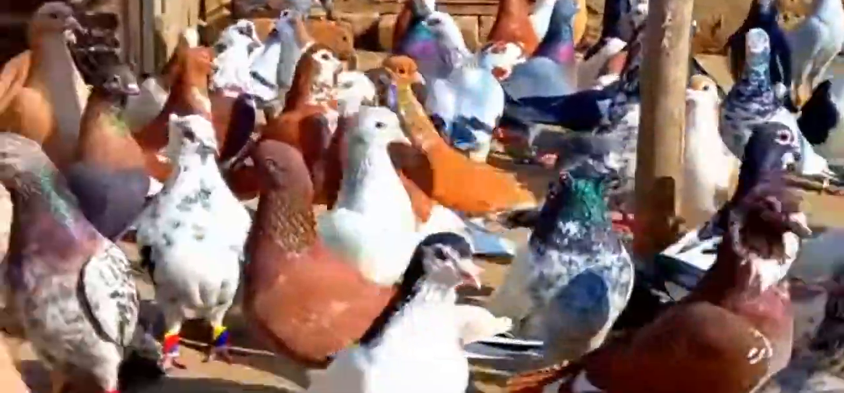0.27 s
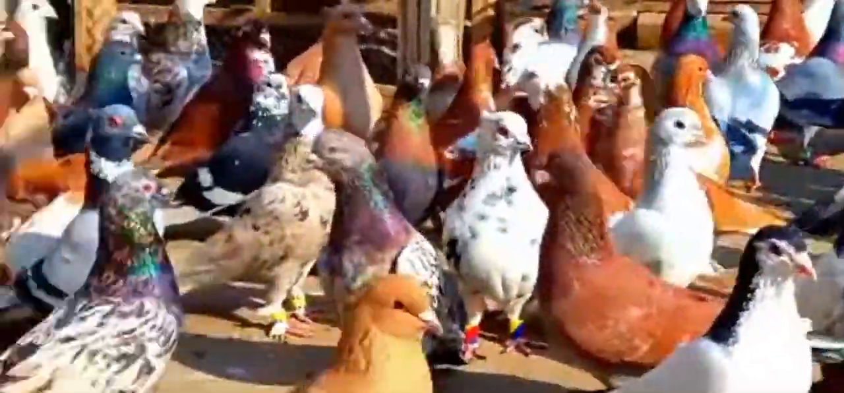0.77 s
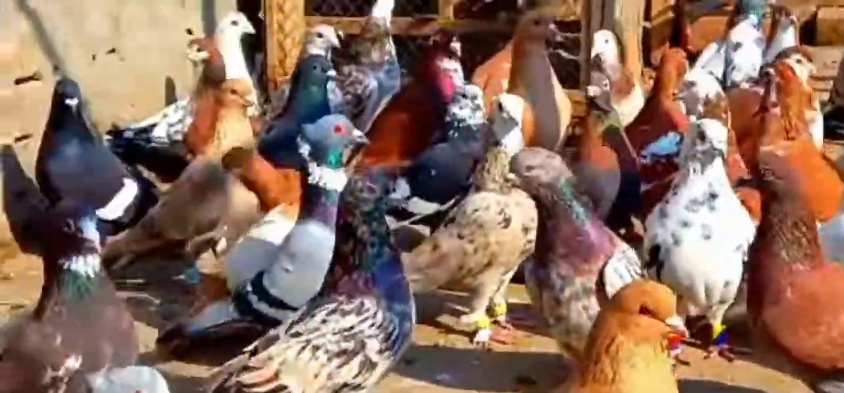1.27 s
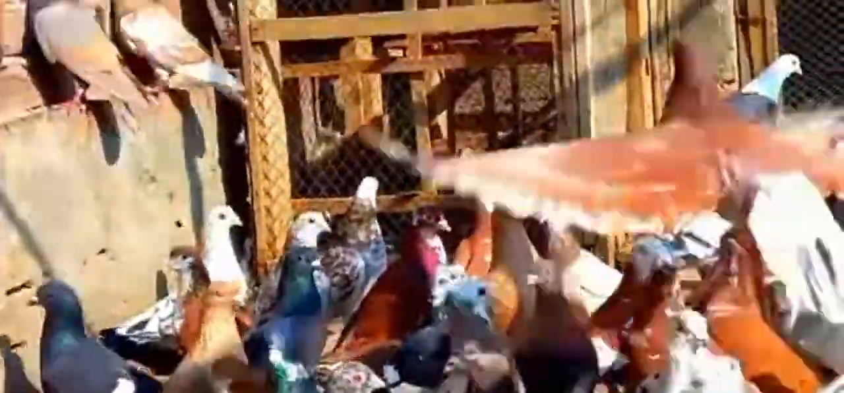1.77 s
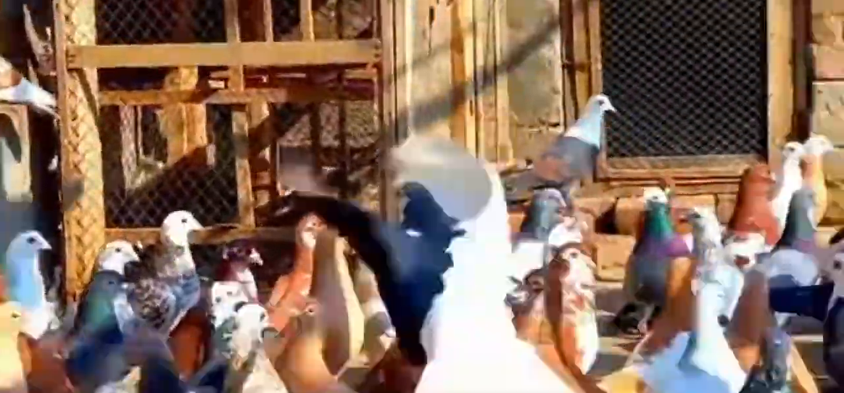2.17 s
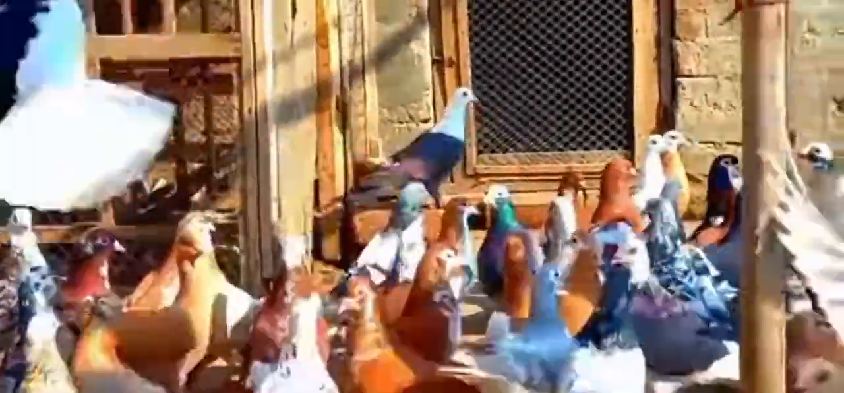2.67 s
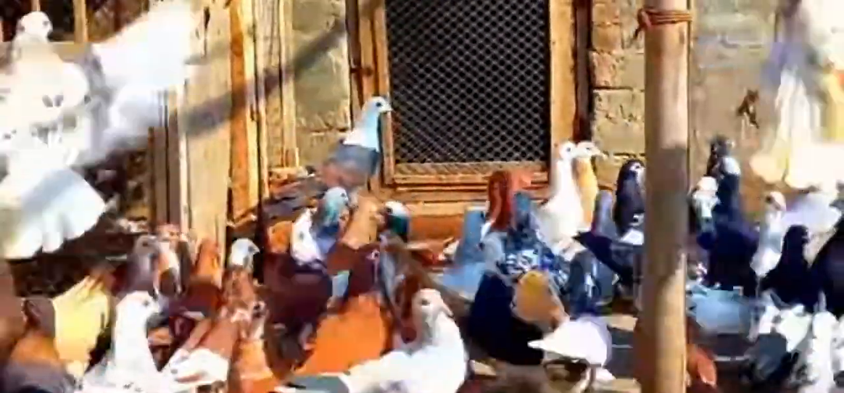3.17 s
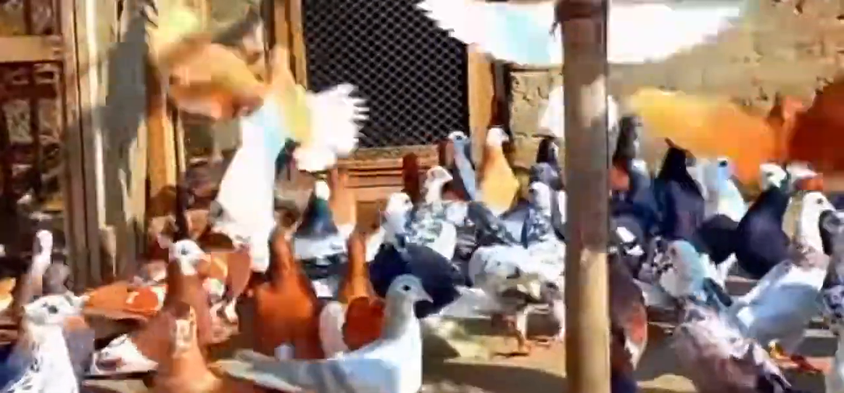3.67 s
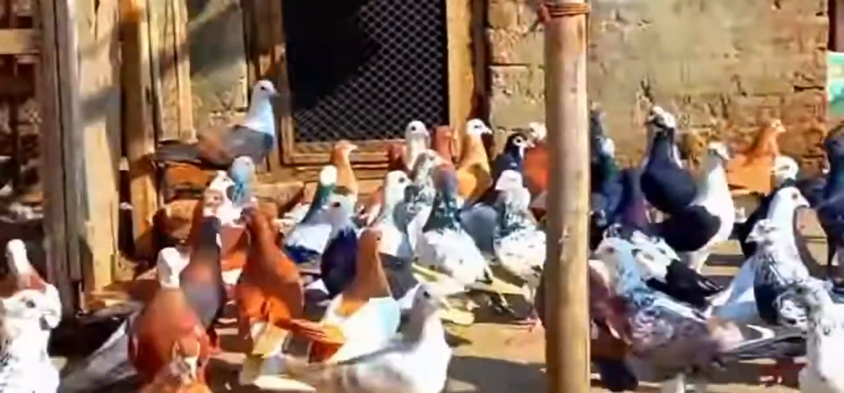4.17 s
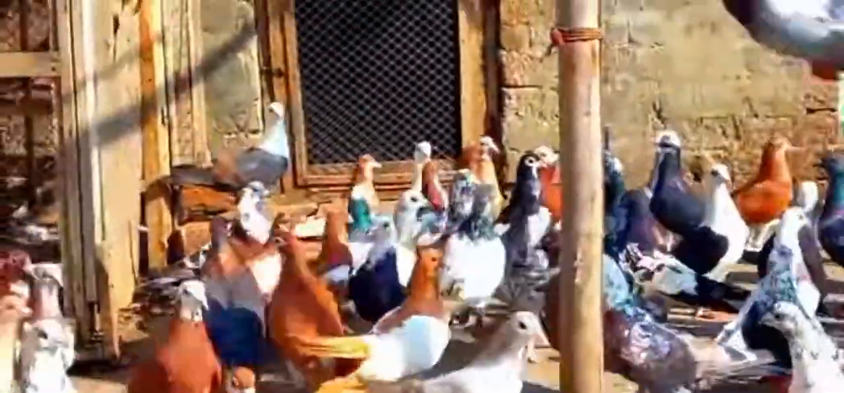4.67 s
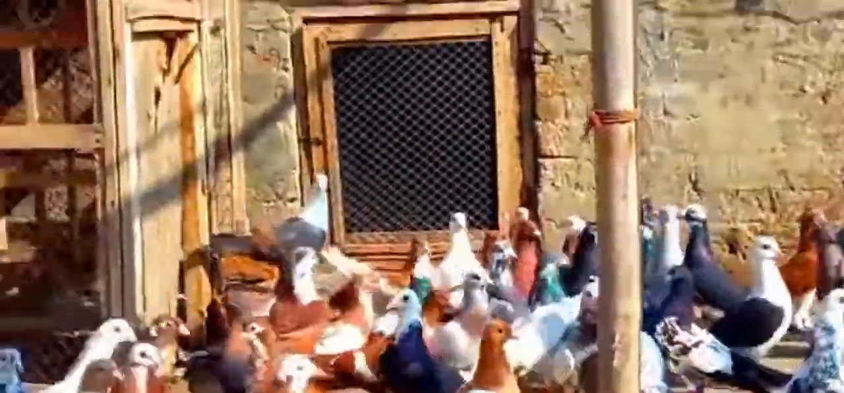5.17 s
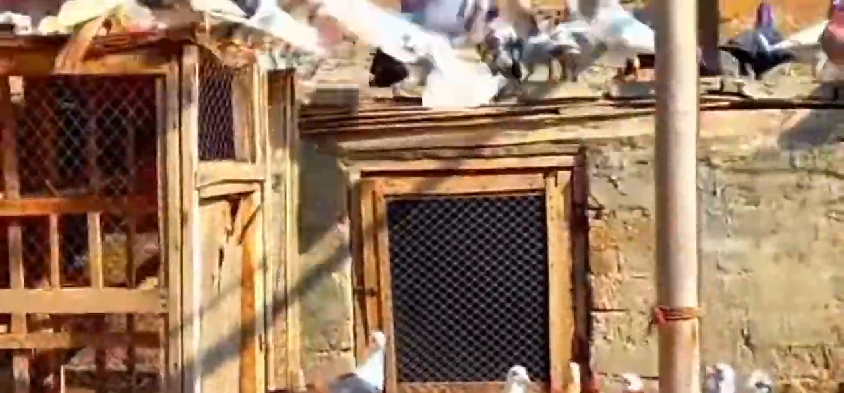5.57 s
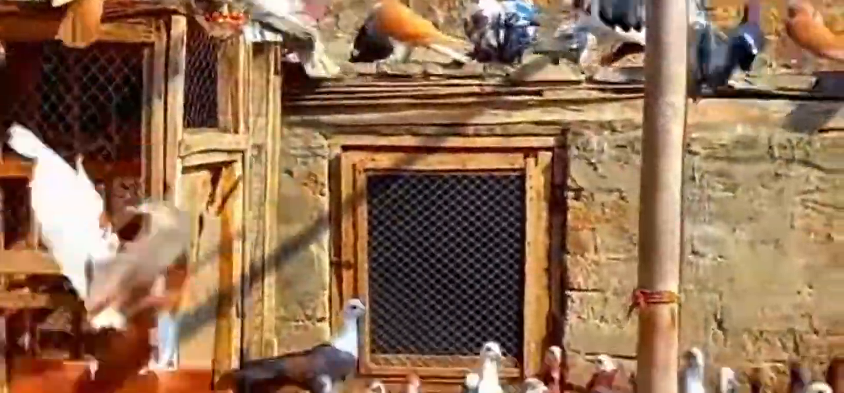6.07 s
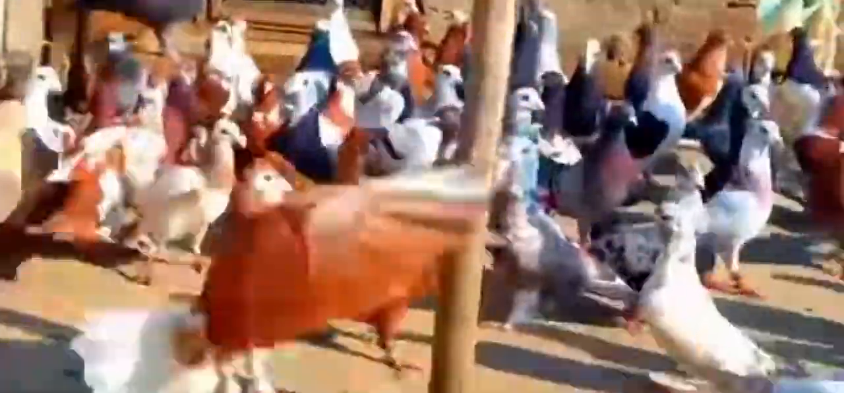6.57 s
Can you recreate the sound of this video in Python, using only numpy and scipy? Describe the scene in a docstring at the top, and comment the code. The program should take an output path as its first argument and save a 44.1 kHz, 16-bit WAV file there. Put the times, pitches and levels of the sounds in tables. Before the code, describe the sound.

Pigeons in a small walled yard: quiet at first, a soft coo and metal latch knocks, then wings flap and clap ever denser and closer.

```python
"""Pigeons in a walled yard

A flock of pigeons takes off and lands in a small walled yard, close to a hand-held phone.
Bands of noise swish, whistle and clap as wings over the blur of farther wings; decaying tones knock
a metal latch twice, with fainter touches after, and jingle leg rings. One bird coos on a throbbing note,
low pops and a gust of noise are downwash on the microphone, and sparse echoes are the brick walls."""
import sys
import numpy as np
from scipy import signal
from scipy.fft import rfft, irfft, next_fast_len
from scipy.io import wavfile
from scipy.ndimage import uniform_filter1d

SR = 44100
rng = np.random.default_rng(int(sys.argv[2]) if len(sys.argv) > 2 else 0)


def transcribe(u):
    """Save the signal u as a 16-bit wav file named by the first command-line argument.

    u: samples, shape (n,) or (channels, n), limited to [-1, 1]; the rate is SR.
    q: integer samples, one column per channel.
    """
    v = np.clip(np.atleast_2d(u).T, -1, 1)
    q = np.round(v * 32767).astype(np.int16)
    wavfile.write(sys.argv[1], SR, q)


N = 300762

# blur of many wings, before it throbs: (time [s], swish [dB], feather hiss [dB], low whoosh [dB], thin air [dB])
FLOCK = [(0.0, -58, -73, -60, -84), (0.49, -52, -61, -65, -84), (0.68, -43, -57, -49.5, -73),
         (0.82, -38, -45, -56, -74), (0.99, -40, -52, -51, -84), (1.25, -41, -65, -48, -81),
         (1.46, -43, -53.5, -54.5, -69), (1.82, -34.5, -46, -55, -58), (2.09, -31, -47, -40, -55),
         (2.49, -33.5, -49.5, -46.5, -71), (3.0, -35, -48.5, -47, -70), (3.25, -26, -39.5, -40, -52),
         (3.51, -27, -33, -38, -47), (3.74, -28.5, -39, -42.5, -39.5), (4.16, -32.5, -40, -52, -48),
         (4.5, -35.5, -46.5, -51.5, -52), (4.88, -32, -44.5, -51, -47.5), (5.05, -30, -41.5, -54, -40),
         (5.19, -31, -42.5, -49.5, -45), (5.45, -29, -40, -51, -48), (5.77, -37.5, -49.5, -47.5, -53.5),
         (6.04, -39, -44.5, -47, -51.5), (6.3, -27.5, -35, -38.5, -72), (6.82, -24, -27.5, -28.5, -60)]
# colour of wing noise at the phone: (frequency [Hz], density [dB per Hz])
WING = [(120, -45), (240, -14), (600, -6), (1120, -7), (1265, -1.5), (1480, -5), (2450, 0.5), (3200, -6),
        (4500, -18), (5600, -11), (6900, -14.5), (8800, -34.5), (10800, -48.5), (13200, -56), (15200, -50)]


def gain_of(db):
    """Decibels to gain."""
    return 10 ** (np.asarray(db) / 20)


def evened(x):
    """Scaled to rms 1."""
    return x / np.sqrt(np.mean(x ** 2) + 1e-20)


def add(mix, s, sound):
    """Lays a sound into the mix at time s, cut at the end."""
    part = mix[..., round(s * SR):][..., :sound.shape[-1]]
    part += sound[..., :part.shape[-1]]


def curve(rows):
    """Columns of a table joined by straight lines, one value a sample."""
    s, *columns = np.transpose(rows)
    return np.array([np.interp(np.arange(N) / SR, s, c) for c in columns])


def coloured(points, low_hz=0, high_hz=SR):
    """Noise of rms 1 with the given spectrum, between two soft edges."""
    size = next_fast_len(N)
    hz = np.fft.rfftfreq(size, 1 / SR) + 1
    point_hz, point_db = np.transpose(points)
    edges = np.sqrt(1 / (1 + (low_hz / hz) ** 16) / (1 + (hz / high_hz) ** 16))
    shape = gain_of(np.interp(np.log(hz), np.log(point_hz), point_db)) * edges
    return evened(irfft(rfft(rng.standard_normal(size)) * shape)[:N])


def resonate(x, hz, width):
    """Shifts the curve hz down to zero, smooths, and shifts back: a resonance of gain 1."""
    turn = np.exp(2j * np.pi * np.cumsum(hz * np.ones(len(x))) / SR)
    r = np.exp(-np.pi * width / SR)
    return 2 * (turn * signal.lfilter([1 - r], [1, -r], x / turn)).real


def hollow(size, hz, width):
    """Noise of rms 1 through a steep resonance."""
    return evened(resonate(resonate(rng.standard_normal(size), hz, width), hz, width))


def wander(seconds):
    """Smooth chance of rms 1 that changes within the given time."""
    size = max(round(seconds * SR), 2)
    return evened(uniform_filter1d(uniform_filter1d(rng.standard_normal(N), size), size))


def patchy(x, patchy_db, seconds, width_hz):
    """Lifts and lowers random patches of time and pitch, as eddies come and go."""
    z = signal.stft(x, nperseg=512, noverlap=384)[2]
    field = rng.standard_normal(z.shape[::-1]).T
    for size, axis in (width_hz * 512 / SR, 0), (seconds * SR / 128, 1):
        field = uniform_filter1d(field, max(round(size), 1), axis)
    return signal.istft(z * gain_of(patchy_db * evened(field)), nperseg=512, noverlap=384)[1][:N]


def yard_air():
    """Far town and shuffling feet: patchy noise that stirs with the flock's low whoosh."""
    # colour of the yard: (frequency [Hz], density [dB per Hz])
    yard = [(29, -31), (50, -23), (75, -0.5), (98, -9.5), (138, -0.5), (337, -12), (661, 1), (746, -31),
            (2560, -2.5), (3250, -9.5), (3760, -50), (4670, -12), (7040, -52), (7950, -31.5), (16000, -38)]
    # the whoosh lifts the yard by at most 6.5 dB
    stir_db = np.clip(0.39 * (curve(FLOCK)[2] + 62), 0, 6.5)
    level_db = -57.5 + 1.2 * wander(.04) + stir_db
    return gain_of(level_db) * patchy(coloured(yard), 3.2, .04, 150)


def walls(x):
    """Sparse taps of random sign from the brick walls, the treble dying first."""
    taps = np.zeros(SR // 2)
    at = np.arange(400, len(taps) - 20, 20)
    taps[at + rng.integers(0, 20, len(at))] = rng.choice([-1., 1.], len(at))
    hz, t, z = signal.stft(taps, SR, nperseg=256)
    t60_s = np.interp(hz, [300, 2000, 8000], [.45, .35, .22])[:, None]
    tail = signal.istft(z * gain_of(-60 * t / t60_s), SR, nperseg=256)[1]
    return signal.fftconvolve(x, tail / np.linalg.norm(tail))[:N]


def downwash():
    """Air pushed against the microphone port: low pops of falling pitch and one rough gust."""
    # pops: (time [s], level [dB], starting pitch [Hz], time scale of fade and glide [s])
    bumps = [(2.93, -46, 150, 0.043), (3.14, -42, 149, 0.12), (3.297, -32.5, 131, 0.026),
             (5.905, -23.5, 266, 0.0079), (6.008, -16.5, 320, 0.0058), (6.066, -34, 200, 0.015)]
    # gust before its roughness: (time [s], level [dB])
    gust_rows = [(6.09, -37.5), (6.14, -37), (6.17, -24), (6.21, -22.5), (6.235, -37.5)]
    # colour of the gust: (frequency [Hz], density [dB per Hz])
    gust_colour = [(60, -19), (250, 1), (1000, -3), (4000, -9), (9000, -26), (16000, -31)]
    out, t = np.zeros(N), np.arange(2000) / SR
    for s, db, top_hz, length in bumps:
        u = t / length
        glide = np.sin(2 * np.pi * top_hz * length * (1 - np.exp(-u)))
        add(out, s, gain_of(db) * np.exp(-3.3 * u) * glide)
    before, after = (gust_rows[0][0] - .02, -120), (gust_rows[-1][0] + .01, -120)
    gust = gain_of(curve([before] + gust_rows + [after])[0])
    rough = gain_of(2.1 * wander(0.0017))
    return out + gust * coloured(gust_colour) * rough


def coo():
    """A soft throbbing note from a swollen crop, part unsteady tone and part resonant breath."""
    # centre of the note, level before throb and blend: (time [s], pitch [Hz], level [dB])
    coo_rows = [(.44, 430, -61), (.47, 450, -54.5), (.52, 514, -54), (.57, 517, -47), (.63, 511, -51),
                (.7, 500, -52.5), (.78, 480, -59)]
    hz, db = curve(coo_rows)
    t = np.arange(N) / SR
    sounding = uniform_filter1d(1. * (t > coo_rows[0][0]) * (t < coo_rows[-1][0]), 900)
    note = np.sin(2 * np.pi * np.cumsum(hz * (1 + 0.0292 * wander(0.0086))) / SR)
    throb = .8 + .5 * np.sin(2 * np.pi * 42 * t + wander(0.069))
    blend = .6 * note * throb + 0.85 * hollow(N, hz, 106)
    return np.sqrt(2) * gain_of(db) * sounding * blend


def rings():
    """Small metal bands on the legs touch: a fuzzy high ring that rattles."""
    # touches, level before tone and fuzz are summed: (time [s], level [dB])
    touches = [(.0124, -55.5), (.195, -58), (.2538, -60), (.2902, -61), (0.962, -41), (1.037, -47),
               (1.0924, -56), (1.1308, -57), (1.1593, -52), (1.7606, -41), (1.8043, -49), (2.165, -36),
               (2.4334, -39)]
    t60_s = 0.091
    out, t = np.zeros(N), np.arange(round(.2 * SR)) / SR
    for s, db in touches:
        hz = 7020 + rng.uniform(-31.9, 58)
        jingle = np.sin(2 * np.pi * hz * t) + 1.56 * hollow(len(t), hz, 240)
        onset = np.minimum(t / 0.00081, 1)
        add(out, s, gain_of(db - 60 * t / t60_s) * jingle * onset)
    return out


def latch():
    """Each knock rings the bolt, rattles the wire gate and booms in its wooden frame."""
    # modes of the bolt, before a stronger start: (frequency [Hz], level [dB], 60 dB decay [s])
    modes = [(1120, -8, 0.46), (1287, -12.5, 1), (2169, -28, .3), (2413, 0, 0.32), (2757, -5, 0.39),
             (3648, 7, 0.27), (4118, 6.5, 0.23), (5570, -12.5, 0.35), (6800, -13.5, 0.21)]
    # gains of each blow: (time [s], ring [dB], rattle and boom [dB])
    knocks = [(.7862, -24, -17.5), (.8845, -31.5, -17), (1.092, -62, -41), (1.128, -53, -41)]
    out, t = np.zeros(N), np.arange(round(.6 * SR)) / SR
    # colours: (frequency [Hz], density [dB per Hz])
    gate = coloured([(500, -42), (1250, -6.0), (2400, 12.0), (3200, 0.5), (4200, 3.5), (5600, -9.5),
                     (7000, -18.0), (8000, -56), (9200, -24), (12000, -34), (15000, -34)])
    frame = coloured([(90, -13), (260, 9.0), (450, 0.0), (720, 1.5), (1200, 10.5), (2000, -50)])
    frame = patchy(frame, 2.7, .04, 200)
    chatter = wander(0.0047)
    # the hand damps the first rattle quickly; a weaker one hangs on
    fade = gain_of(-60 * t / 0.061) + gain_of(-5.0 - 60 * t / 0.34)
    for k, (s, ring_db, rattle_db) in enumerate(knocks):
        chance = rng.random((len(modes), 3))
        part = slice(k * len(t), (k + 1) * len(t))
        ring = np.zeros(len(t))
        for (hz, db, t60), (a, b, c) in zip(modes, chance):
            # a loose bolt splits every mode into a beating pair; low modes take longer to build
            tone = np.sin(2 * np.pi * (hz * t + a))
            twin = .4 * np.sin(2 * np.pi * ((hz + 25 + 30 * c) * t + b))
            build = np.minimum(t * hz ** 2 / 18000, 1) * (1 + 1.9 * gain_of(-60 * t / 0.052))
            ring += gain_of(db - 60 * t / t60) * build * (tone + twin)
        # loose parts chatter after the blow, so the ring is rough
        ring *= gain_of(5.2 * chatter[part] * np.minimum(t / 0.028, 1))
        boom = gain_of(-13 - 60 * t / 0.56) * np.minimum(t / 0.039, 1) * frame[part]
        add(out, s, gain_of(ring_db) * ring + gain_of(rattle_db) * (fade * gate[part] + boom))
    return out


def whistles():
    """Stiff feathers sing on a stroke: fuzzy gliding notes with a third harmonic."""
    # level before tone and fuzz are blended: (time [s], level [dB], start [Hz], end [Hz], length [s])
    notes = [(1.228, -53, 650, 810, .05), (1.33, -38, 943, 930, 0.023), (1.344, -30.5, 735, 970, 0.033),
             (1.442, -45, 910, 905, 0.033), (1.473, -35.5, 625, 780, 0.051), (1.925, -28, 766, 919, 0.056),
             (2.473, -26.5, 930, 970, 0.015), (3.54, -30.5, 774, 852, 0.062),
             (3.68, -26.5, 793, 856, 0.026), (4.315, -40.5, 8930, 8700, 0.03),
             (4.36, -41.5, 8500, 9100, .035), (5.572, -25.5, 880, 840, 0.021),
             (6.259, -32.5, 431, 432, 0.058), (6.46, -31.5, 484, 498, 0.045), (6.499, -34, 590, 623, 0.22),
             (6.567, -35.5, 306.4, 312, 0.053), (6.61, -40, 910, 920, 0.045)]
    out = np.zeros(N)
    for s, db, start_hz, end_hz, length in notes:
        hz = np.linspace(start_hz, end_hz, round(length * SR))
        turn = 2 * np.pi * (np.cumsum(hz) / SR + rng.random())
        third = 0.84 * np.sin(3 * turn) * (3 * hz < SR / 2)
        tone = np.sqrt(2) * (np.sin(turn) + third)
        fuzz = hollow(len(hz), hz, 0.16 * start_hz)
        add(out, s, gain_of(db) * np.hanning(len(hz)) * (0.69 * tone + 0.68 * fuzz))
    return out


def crackle(drive):
    """Tiny feather snaps of many pitches, louder where the wings are busy."""
    out, t = np.zeros(N), np.arange(400) / SR
    for hz in np.geomspace(750, 7000, num=14):
        struck = rng.random(N) < 32. / SR  # 32 snaps a second at each pitch, on average
        sizes = gain_of(5.4 * np.minimum(rng.exponential(1, N), 4)) * struck
        snap = np.sin(2 * np.pi * hz * t) * np.exp(-t * hz / 8.1) * np.minimum(t / 0.00039, 1)
        colour = gain_of(np.interp(hz, *np.transpose(WING)) * 1.52)
        out += colour * signal.oaconvolve(sizes, snap)[:N]
    return drive * evened(out)


def claps(air):
    """Wing tips meet: three feather tips slap within some milliseconds, with a hollow note."""
    # before the fixed trims below: (time [s], level [dB], hiss against the level [dB], note [Hz])
    meetings = [(0.5042, -34, 12, 2450), (0.7508, -21, -7, 2720), (1.333, -15.5, -26, 2020),
                (1.4595, -11.5, -21, 2510), (1.5916, -27.5, 1, 2470), (1.7074, -15.5, -10, 1230),
                (1.8379, -19, -28, 1240), (1.902, -15, -14, 2860), (2.0598, -12, -8, 1140),
                (2.1101, -5.5, -17, 2640), (2.225, -16, -20, 1250), (2.3692, -19, -5, 1260),
                (2.5634, -17, -8, 2390), (2.6744, -19, -12, 2310), (2.7016, -14, -27, 2970),
                (2.7503, -15, -31, 2590), (2.819, -14, -20, 2580), (2.8896, -13, -32, 2080),
                (2.997, -20, -8, 2770), (3.018, -3.5, -39, 2270), (3.073, -15, -17, 2160),
                (3.148, -11.5, -7, 2670), (3.6277, -8, -11, 1860), (3.7983, -11, -9, 2420),
                (3.825, -10.5, -5, 2100), (3.9502, -17, -3.5, 1240), (3.9855, -10, -11, 2580),
                (4.038, -24, 1, 2110), (4.0668, -19.5, -3, 2560), (4.72, -16, -9.5, 1350),
                (4.8453, -5.5, -13.5, 2700), (4.871, -12, 1, 2170), (5.1, -5.5, -13, 2330),
                (5.1998, -5.5, -8.5, 1270), (5.2902, -7, -3.5, 2450), (5.3905, -3.5, -8, 2500),
                (5.4381, -9, -3, 2200), (5.4929, -6, -10, 1950), (5.5463, -18, -5.5, 1830),
                (5.598, -9, 1.5, 2200), (5.7072, -10, 1.5, 2070), (5.7438, -15, -6, 1220),
                (5.9318, -21, -0.5, 2040), (6.037, -23, 5, 1900), (6.146, -12.5, -4, 1320),
                (6.428, -15, -25, 2980), (6.574, -12, -26, 2470), (6.6945, -1.5, -28, 2300)]
    t60_s = np.array([[0.025], [.04]])  # slap, note
    slap, notes, t = np.zeros((5, N)), np.zeros(N), np.arange(round(.08 * SR)) / SR
    for s, db, hiss_db, hz in meetings:
        late = t - np.array([[0], [.0025], [.006]]) * rng.uniform(0.87, 1.0, (3, 1))
        tips = (late > 0) * np.exp(-abs(late) / .0016) * rng.uniform(.6, 1, (3, 1))
        fade, linger = gain_of(db - 8.5 - 60 * t / t60_s)
        shape = np.minimum(t / .0005, 1) * (.7 + 1.2 * tips.sum(0))
        bands_db = [[-26.], [-3.5], [hiss_db], [hiss_db - 7.0], [hiss_db - 26]]
        add(slap, s, (shape * fade * gain_of(bands_db)) ** 2)
        add(notes, s, shape * linger * hollow(len(t), hz, 310))
    return (air * np.sqrt(slap)).sum(0) + gain_of(-3.5) * notes


def stroke_colour(s, rise, length):
    """Hiss and whoosh [dB] against a stroke's swish, from its rise, length and the flock's colour."""
    when, *levels = np.transpose(FLOCK)
    swish, hiss, whoosh = (np.interp(s, when, level) for level in levels[:3])
    # a fast start hisses more and a long stroke whooshes more, counted in doublings of time
    slower, longer = np.log2(rise / .016), np.log2(length / .04)
    # both lean toward the colour of the flock at that moment
    hiss_db = -11.5 - 0.5 * slower + 0.38 * (hiss - swish + 11)
    whoosh_db = -18.5 + 3 * longer + 0.45 * (whoosh - swish + 15)
    return hiss_db, whoosh_db


def wings():
    """Turbulence in six bands, opened by the flock's blur, by each stroke and by each clap."""
    # edges of the six bands, low to high: [Hz]
    edges_hz = [170, 400, 950, 3900, 8400, 12400, 16400]
    # strokes, before trims: (time of the top [s], swish [dB], hollow note at the top [Hz],
    # rise from 7.3 dB below the top [s], fall to 7.3 dB below it [s])
    strokes = [(0.057, -48, 1150, 0.0099, 0.032), (.508, -36, 2900, 0.0065, 0.039),
               (.622, -29, 2750, .016, 0.016), (0.654, -32.5, 2650, 0.013, .013),
               (0.721, -42, 1250, 0.019, .01), (.755, -35, 2680, 0.0043, 0.012),
               (1.248, -30.5, 1644, 0.018, 0.023), (1.364, -28.5, 2420, 0.029, 0.031),
               (1.462, -29, 2480, 0.0052, 0.014), (1.515, -23, 2290, 0.022, 0.022),
               (1.593, -32, 2420, .02, 0.012), (1.686, -37, 2780, .035, 0.013),
               (1.712, -29.5, 1200, 0.0056, 0.012), (1.842, -29, 1210, .006, 0.017),
               (1.969, -26, 870, 0.043, .03), (2.032, -28, 2770, .019, 0.022),
               (2.066, -32.5, 1225, 0.061, .02), (2.114, -35, 2500, 0.0047, 0.09),
               (2.228, -24.5, 1277, 0.024, 0.022), (2.3, -33, 425, .015, .015),
               (2.377, -28.5, 1280, 0.055, .023), (2.446, -28, 2390, 0.026, 0.028),
               (2.485, -30.5, 960, 0.022, 0.04), (2.572, -25.5, 2370, 0.0073, 0.022),
               (2.616, -26, 1290, .01, 0.011), (2.681, -26.5, 2280, 0.049, 0.023),
               (2.705, -34.5, 330, .035, .03), (2.782, -25.5, 2520, 0.05, 0.017),
               (2.825, -26, 2520, .009, 0.01), (2.894, -27, 2080, 0.032, 0.017),
               (2.941, -23.5, 2270, 0.011, 0.0082), (2.994, -27.5, 1240, 0.048, 0.0062),
               (3.091, -20, 2530, 0.021, 0.053), (3.193, -21, 1290, 0.027, 0.062),
               (3.272, -21.5, 1650, 0.02, 0.025), (3.343, -19, 1230, 0.018, 0.026),
               (3.459, -22.5, 1280, .021, .009), (3.507, -23, 3220, 0.039, .021),
               (3.581, -24.5, 1570, 0.048, 0.026), (3.631, -23, 1810, 0.011, 0.044),
               (3.742, -25.5, 1310, 0.037, .046), (3.773, -25, 1630, 0.015, .006),
               (3.827, -27.5, 1540, .023, 0.011), (3.878, -21, 2500, 0.029, 0.02),
               (3.99, -22.5, 2550, 0.036, 0.0096), (4.072, -24.5, 1280, .01, 0.05),
               (4.14, -23, 2420, 0.014, 0.015), (4.26, -31, 1240, 0.055, 0.036),
               (4.418, -31, 1240, 0.058, .018), (4.544, -30, 2660, .019, 0.035),
               (4.723, -30.5, 1290, .063, 0.022), (4.881, -22.5, 2260, 0.016, 0.018),
               (4.96, -23.5, 2630, .01, 0.03), (5.033, -20.5, 2570, 0.038, 0.02),
               (5.102, -19.5, 2400, .03, 0.018), (5.173, -21, 2040, 0.014, 0.0048),
               (5.2, -18.5, 1230, .006, .021), (5.273, -19.5, 2000, 0.014, 0.0054),
               (5.294, -21, 2350, 0.0054, 0.017), (5.365, -20.5, 2170, 0.0076, 0.012),
               (5.393, -20, 2470, .026, 0.013), (5.498, -14.5, 1930, 0.0027, 0.006),
               (5.577, -22.5, 1990, 0.018, 0.0078), (5.604, -21, 2130, .006, 0.008),
               (5.688, -25.5, 2000, 0.011, .014), (5.712, -25, 2090, .0065, .007),
               (5.935, -23.5, 2010, .005, 0.014), (5.967, -29.5, 1160, .006, 0.0082),
               (6.042, -28, 1940, 0.0072, 0.025), (6.265, -24.5, 2160, 0.011, .012),
               (6.306, -29, 1900, 0.039, 0.038), (6.448, -20.5, 2590, 0.024, 0.034),
               (6.611, -17.5, 2216, 0.036, 0.042), (6.7, -17.5, 2320, 0.0076, 0.0087),
               (6.76, -21.5, 1520, 0.027, 0.037)]
    air = np.array([coloured(WING, a, b) for a, b in zip(edges_hz, edges_hz[1:])])
    swish, hiss, whoosh, thin = gain_of(curve(FLOCK))
    # the more a wing whooshes, the deeper the whoosh reaches
    deep = gain_of(-3.0) * whoosh * (whoosh / swish) ** 0.44
    # many unseen beats overlap, so the blur throbs
    throb = gain_of(2.0 * wander(0.017) - 2.0)
    blur = np.array([deep, whoosh, swish, hiss, thin, gain_of(-36) * swish]) * throb
    # the low whoosh comes in slower, deeper puffs with hollow pauses
    blur[:2] = blur[:2] * gain_of(3.3 * wander(0.028) - 2.5)
    stroke, notes = np.zeros((6, N)), np.zeros(N)
    for s, db, hz, rise, fall in strokes:
        hiss_db, whoosh_db = stroke_colour(s, rise, rise + fall)
        t = np.arange(-1.6 * rise, 1.3 * fall, 1 / SR)
        # the wing holds its speed through the stroke and stops short
        shape = gain_of(db - 7.3 * abs(t / np.where(t < 0, rise, fall)) ** 1.88)
        bands_db = [1.9 * whoosh_db - 8.5, whoosh_db, -2.5, hiss_db, hiss_db - 10, -38.]
        add(stroke, s + t[0], (shape * gain_of(bands_db)[:, None]) ** 2)
        # the pocket of air under the wing favours one pitch, which rises as the pocket closes
        add(notes, s + t[0], shape * hollow(len(t), hz * (1 + 2.92 * t), 204))
    # feathers slip past one another, so each stroke is ragged
    ragged = gain_of(2.67 * wander(0.0023) - 1.08)
    turbulence = (air * np.sqrt(blur ** 2 + stroke * ragged ** 2)).sum(0)
    body = turbulence + gain_of(-6.5) * ragged * notes
    busy = np.sqrt(blur[2] ** 2 + stroke[2])
    eddies = patchy(body, 2.94, .025, 420) * gain_of(-1.15)
    return eddies + crackle(gain_of(-11.0) * busy) + claps(air[1:])


def scene():
    """The birds and the gate in the yard, with the air that hits the phone directly."""
    near = wings() + whistles() + latch() + rings() + coo()
    return (near + gain_of(-16) * walls(near) + yard_air() + downwash())[None]


def record(dry):
    """The hand's echo dips one band; the phone's case rings, its input overloads and its port colours."""
    # dip made by the echo off the hand; it slides up while the grip shifts: (time [s], centre [Hz])
    hand = [(0, 3840), (2.93, 3740), (2.98, 4100), (3.02, 6200), (3.05, 8800), (3.065, 3680), (6.82, 3760)]
    # treble of the phone's port: (frequency [Hz], gain [dB])
    port_rows = [(0, -1.5), (9000, 2), (11200, -5.5), (13400, -10), (14900, 4), (15700, -5), (15950, -27),
                 (22050, -22)]
    held = dry[0] - .85 * resonate(dry[0], curve(hand)[0], 900)
    # the case rings faintly with all it hears
    held = held + 0.49 * resonate(held, 1275, 62)
    # the phone cuts deep bass
    held = signal.sosfilt(signal.butter(3, 52, "high", fs=SR, output="sos"), held)
    held = .95 * np.tanh(held / .95)  # the loudest claps overload the input
    hz = np.linspace(0, SR / 2, 257)
    port = signal.firwin2(255, hz, gain_of(np.interp(hz, *np.transpose(port_rows))), fs=SR)
    top_edge = signal.firwin(511, 16450, window=("kaiser", 9), fs=SR)
    return signal.oaconvolve(held, np.convolve(port, top_edge), "same")[None]


dry = scene()
out = record(dry)
transcribe(out)
```